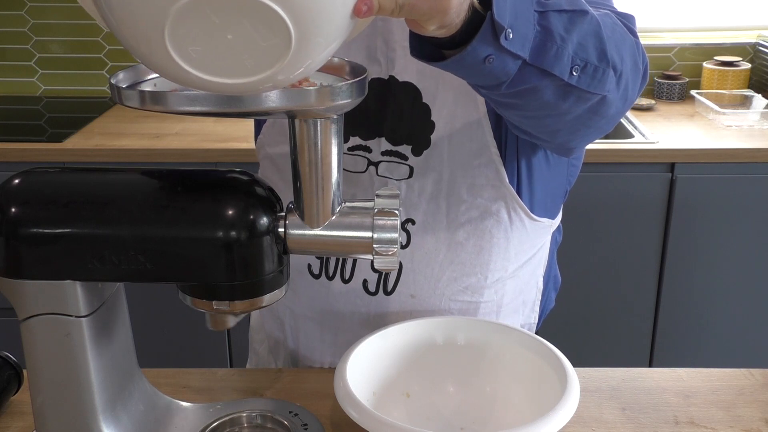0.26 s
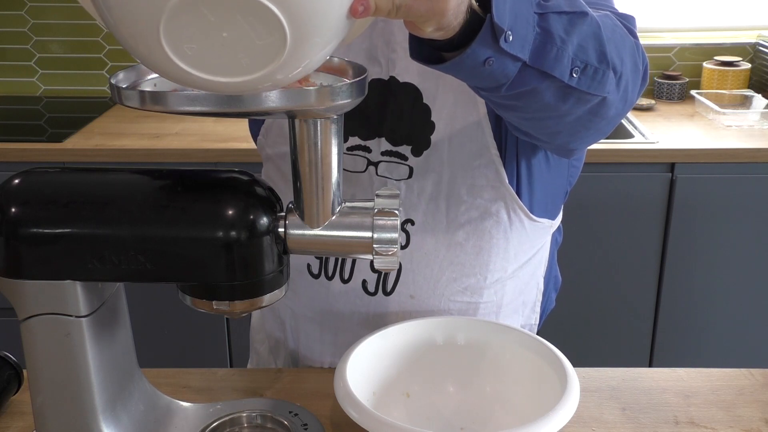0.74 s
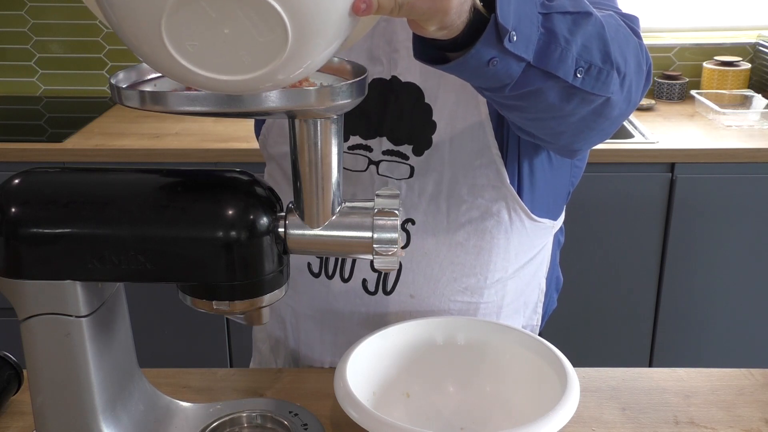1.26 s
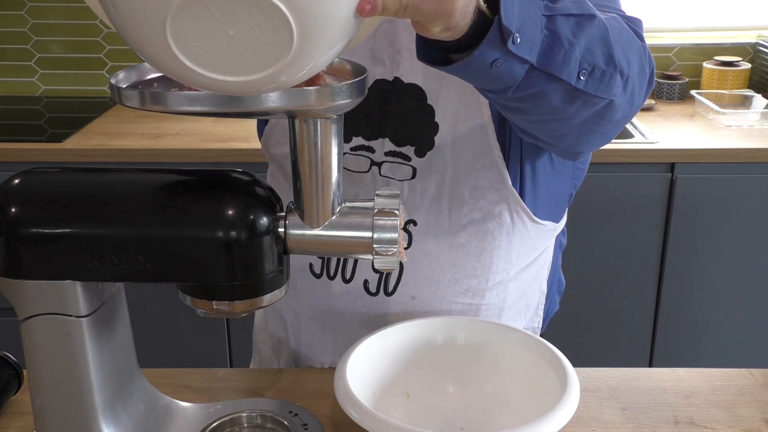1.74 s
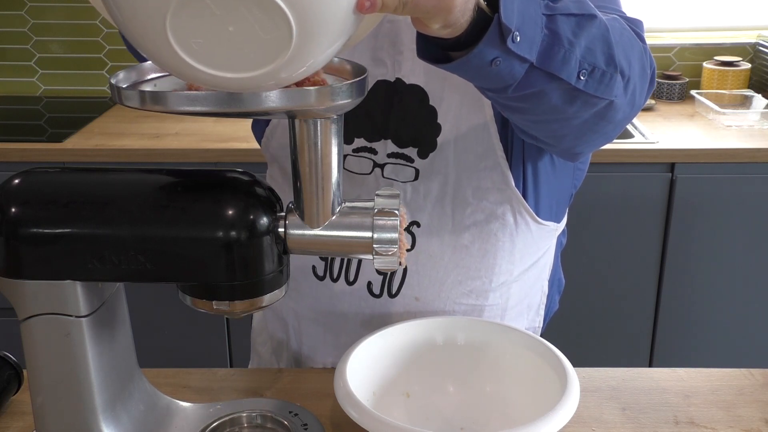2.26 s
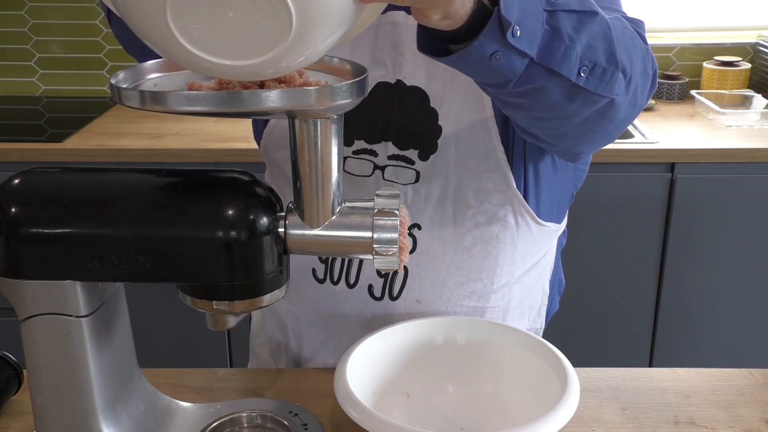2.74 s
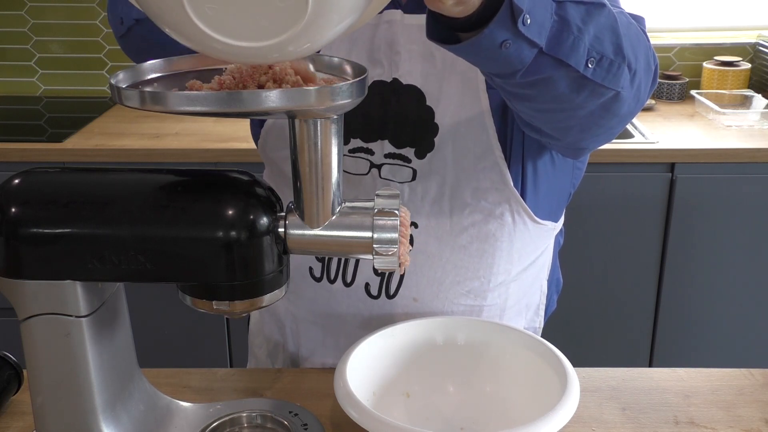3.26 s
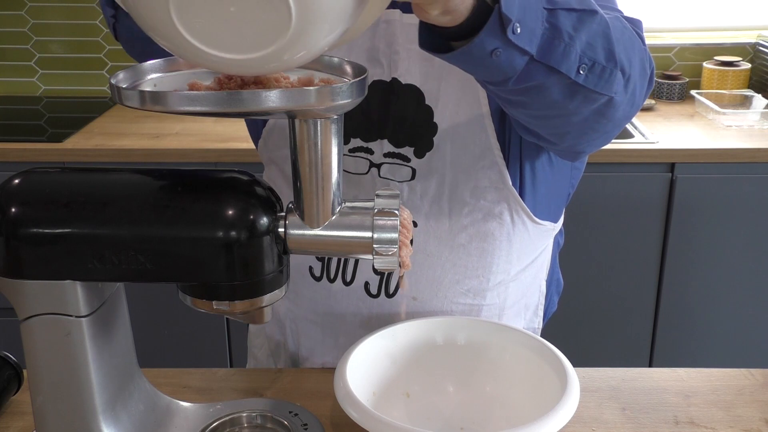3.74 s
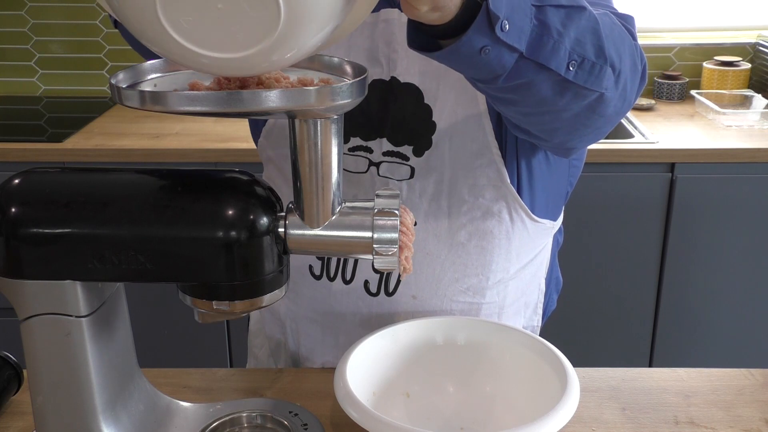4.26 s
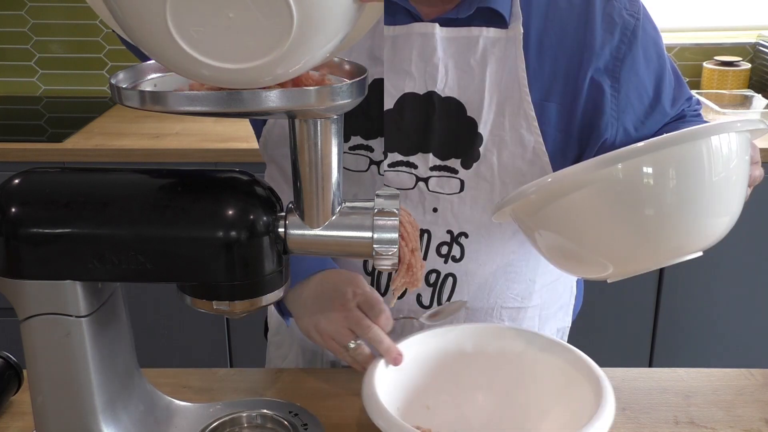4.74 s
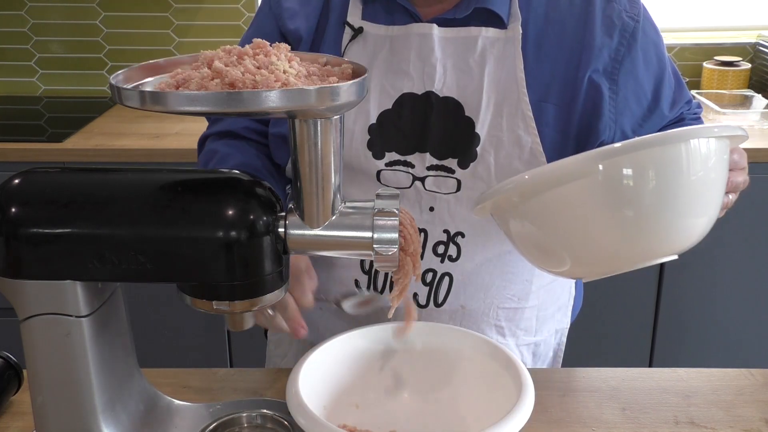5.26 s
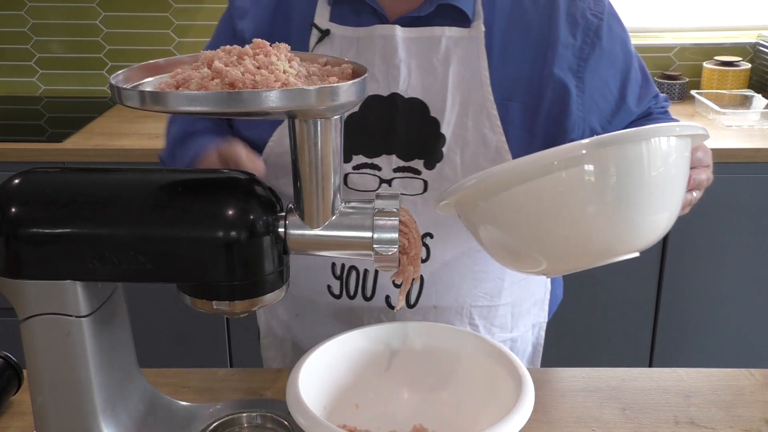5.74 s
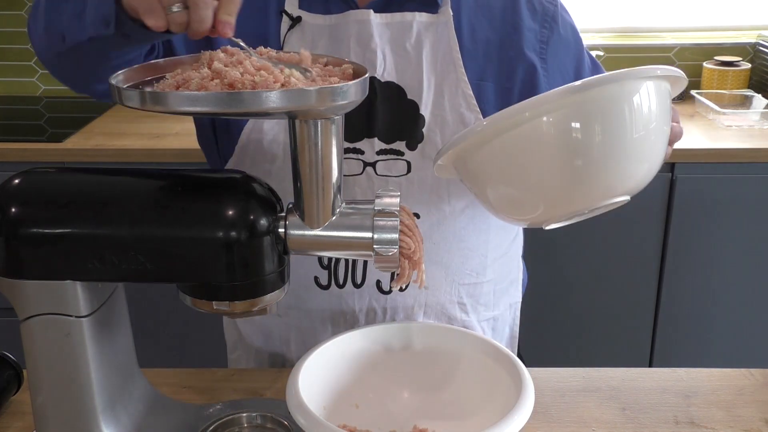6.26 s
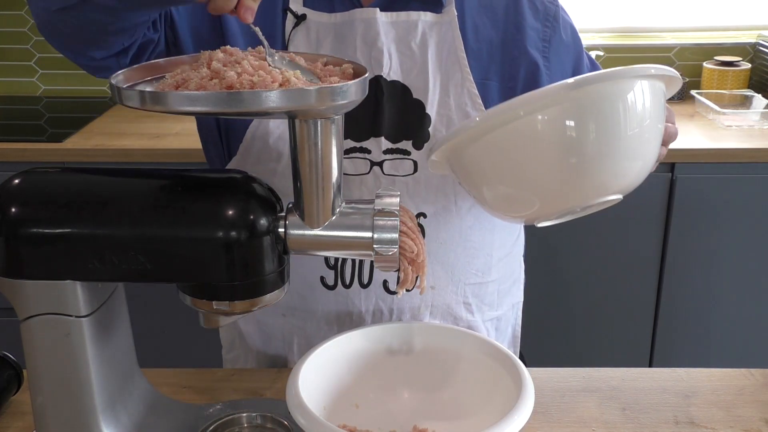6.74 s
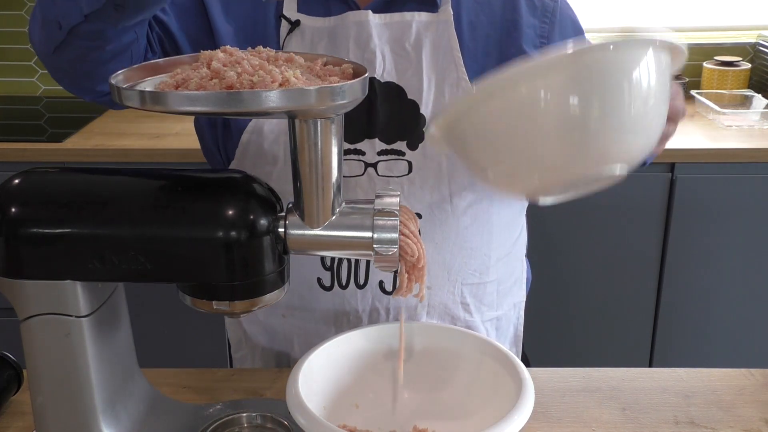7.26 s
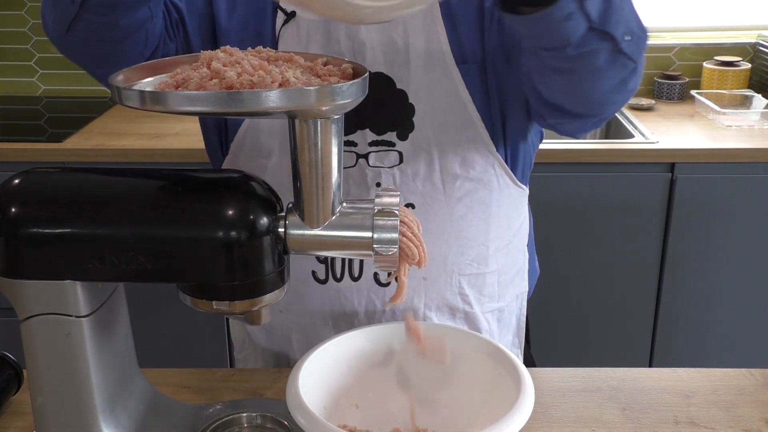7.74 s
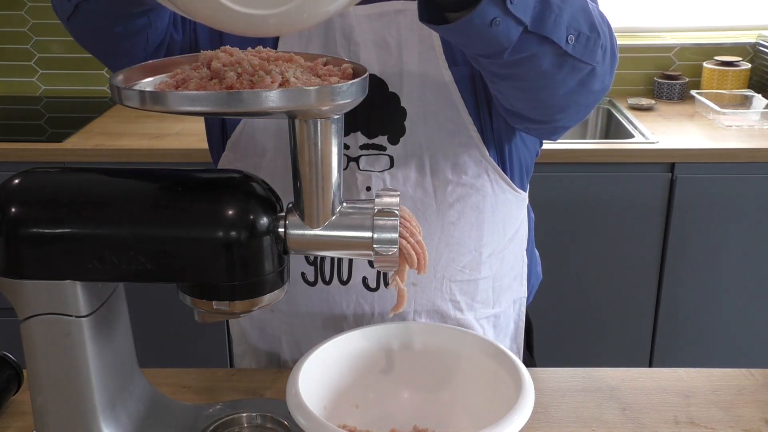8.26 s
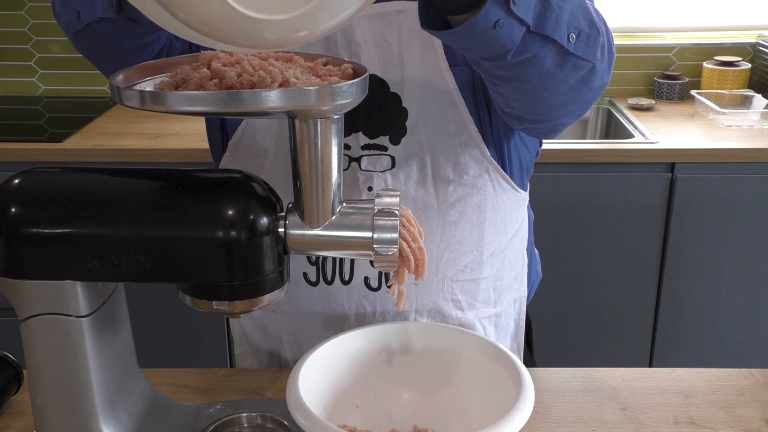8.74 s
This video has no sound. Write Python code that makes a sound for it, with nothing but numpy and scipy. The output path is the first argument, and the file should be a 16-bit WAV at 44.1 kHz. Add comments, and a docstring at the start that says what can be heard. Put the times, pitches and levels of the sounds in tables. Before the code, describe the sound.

A mixer motor hums and whines steadily while driving a meat mincer, with metallic gear ticking, wet gritty crunches, utensil clinks and bowl knocks.

```python
"""Mixer-driven meat mincer

A stand mixer drives a meat mincer on a kitchen counter. The motor hums at multiples of twice the mains,
whines at a pitch that sags as the screw bites, and roars as shaped noise through its housing.
Gear teeth tick as grazed ringing modes, meat crunches in grainy noise bursts, a spoon clinks on the tray,
bowls knock. Midway the sound crossfades into a brighter one and the hum dips."""
import sys
import numpy as np
from scipy import signal
from scipy.io import wavfile
from scipy.ndimage import uniform_filter1d

SR = 44100
rng = np.random.default_rng(int(sys.argv[2]) if len(sys.argv) > 2 else 0)


def master(y):
    """Save y as 16-bit WAV."""
    cut = np.clip(np.atleast_2d(y).T, -1, 1)
    pcm = np.round(cut * 32767)  # scale
    wavfile.write(sys.argv[1], SR, pcm.astype(np.int16))


N = 396900
T = np.arange(N) / SR

# Whine pitch at the turning points of each bite of the screw: time_s, pitch_hz
WHINE_PITCH = [(-.2, 1847), (.08, 1781), (.47, 1891), (.97, 1761), (1.27, 1885), (1.751, 1752),
               (2.04, 1866), (2.3, 1905), (2.57, 1790), (3.08, 1910), (3.35, 1801), (3.6, 1850),
               (3.86, 1915), (4.211, 1805), (4.62, 1921), (4.97, 1810), (5.5, 1945), (5.87, 1847),
               (6.12, 1927), (6.36, 1948), (6.599, 1834), (7.17, 1957), (7.46, 1877), (7.829, 1988),
               (8.221, 1810), (8.62, 1967), (9.05, 1835)]
# Hum partials: multiple_of_hum, dull_relative_db, bright_relative_db, waver_db
HUM_PARTIALS = [(1, 0.5, 1, 0.56), (2, -23.5, -22, 1.5), (3, -19, -16, 1.5), (3.5, -30, -34, 10),
                (4, -7.5, -8, 1.5), (5, -7, -10.5, 2.5), (6, -23, -20, 1), (8, -24, -23, 1.5),
                (10, -25.5, -24, 4.5), (12, -35.5, -38, 7), (15, -28, -24, -1)]
# Counter buzz: time_s, level_db
COUNTER_BUZZ = [(0.0, -22), (0.12, -32), (4.21, -27), (4.81, -34), (8.72, -26), (9.0, -36)]
# Whine partials: multiple_of_whine, offset_in_multiples_of_hum, dull_base_db, bright_base_db
WHINE_PARTIALS = [(1, 0, -43.5, -41.5), (1, 1, -54, -54), (2, -0.15, -55, -50.5), (2.5, -0.5, -58, -60),
                  (3, 0, -58, -50.5), (4, -0.5, -46, -48), (5, 0, -47, -48.5), (4, 6, -61, -57)]
# Housing resonances: centre_hz, width_hz, dull_lift_db, bright_lift_db
HOUSING_MODES = [(374, 48, 2, 11), (874, 98, 5, -2), (1178, 50, 4.5, 9), (1497, 62, 4.5, 13.5),
                 (1914, 70, 4.5, 5.5), (2076, 87, 10.5, 8.5), (2890, 230, 3.5, 16.5), (3230, 74, 8.5, 7),
                 (3430, 83, -2.5, 11.5), (3900, 240, 2.5, 10.5), (4420, 230, 4, 1), (5630, 230, 5.5, 2),
                 (6100, 520, 7.5, 9), (7700, 190, 5.5, 5.5), (8370, 190, 2.5, 6), (8900, 95, 6.5, 13),
                 (10540, 170, 5, 4), (12300, 300, 7, -1), (14700, 600, 13, -2)]
# Roar spectrum, dull: frequency_hz, relative_density_db
DULL_ROAR = [(12, -66), (20, -32), (42, -23), (66, -20.5), (101, -10), (129, -24), (153, -17.5), (343, -15),
             (492, -8), (566, -12.5), (2040, -24.5), (2340, -32.5), (5110, -37.5), (8910, -29.5),
             (15600, -43.5)]
# Roar spectrum, bright: frequency_hz, relative_density_db
BRIGHT_ROAR = [(12, -65), (20, -31), (42, -25), (66, -17), (101, -13.5), (129, -24), (153, -20.5),
               (245, -24.5), (479, -15), (669, -12), (1340, -21), (2040, -17), (2410, -28), (6210, -30),
               (15600, -33.5)]
# Gear pace: time_s, turns_made
GEAR_TURNS = [(.071, 0), (4.227, 24), (4.770, 27), (8.982, 52)]
# Tick of each gear tooth: dull_base_db, bright_base_db
TOOTH_LEVELS = [(-20.5, -17.5), (-37, -16.5), (-27, -21), (-32, -21)]
# Loudest gear ticks: start_s, peak_db
LOUD_TICKS = [(0.0686, -15.5), (.4189, -22), (0.758, -18), (1.2885, -21), (1.459, -16.5), (0.9388, -15),
              (1.117, -16), (1.6367, -18), (1.8188, -17), (2.156, -19), (3.1413, -19.5), (3.3662, -17),
              (4.7693, -13.5), (4.9412, -12), (5.1636, -16), (5.5, -14.5), (5.6221, -10.5), (5.7068, -14),
              (5.7927, -13), (6.0096, -16), (5.836, -12.5), (6.2987, -14), (6.341, -10.5), (6.4067, -13),
              (6.548, -12), (6.681, -12.5), (7.3035, -12), (7.349, -12.5), (7.3886, -10), (7.806, -17),
              (8.1364, -16), (8.3589, -13), (8.6894, -14.5), (8.766, -10.5), (8.8104, -14)]
# Ringing modes of the mincer head: nominal_hz, relative_db, t60_s
HEAD_MODES = [(1470, -0.5, 0.019), (1943, 2, 0.016), (2057, 3, 0.028), (2440, -12, 0.012),
              (2754, -4, 0.023), (3170, -7, 0.016), (4020, -8, 0.0066), (4770, -12, 0.0055),
              (5630, -15, 0.0064)]
# Loudest meat crunches: start_s, peak_db
LOUD_CRUNCHES = [(1.8856, -21), (3.484, -18), (5.731, -14.5), (5.7642, -15), (6.452, -16), (6.502, -20),
                 (7.309, -9), (8.072, -15), (8.118, -18), (8.2181, -17), (8.8325, -13)]
# Spoon and tray clinks: start_s, ring_peak_db, strongest_ring_hz
SPOON_CLINKS = [(1.022, -25, 6500), (1.448, -22, 8020), (1.499, -26, 8100), (2.567, -18.5, 6830),
                (2.859, -4, 5630), (3.008, -20.5, 8370), (3.413, -22, 6550), (4.082, -21.5, 6260),
                (4.297, -17.5, 6800), (4.687, -19, 2900), (5.973, -20, 6370), (6.676, -18.5, 6100),
                (7.548, -23, 6750), (7.611, -19, 6800), (7.991, -23, 4670), (8.222, -22, 6570)]
# Ringing modes of the tray: pitch_hz, relative_db, t60_s
TRAY_MODES = [(2110, -2, 0.025), (3620, -14, 0.044), (4930, -11, 0.071), (5630, -9.5, 0.025),
              (6500, -27, 0.04), (7280, -4, 0.021), (7970, -23, 0.025), (8800, -14.5, 0.029),
              (11100, -11, 0.014), (13500, -31, 0.01)]
# Bowl knocks: start_s, peak_db, pitch_hz, t60_s
BOWL_KNOCKS = [(.588, -15, 1006, 0.053), (2.853, -20, 110, 0.037), (4.688, -16.5, 224, 0.043),
               (4.738, -18, 203, 0.034), (5.768, -13.5, 702, 0.079), (7.992, -3, 570, 0.048),
               (8.232, -10.5, 686, 0.032)]

BLEND_FROM_S, BLEND_TO_S = 4.42, 4.885
BRIGHT_SHARE, BRIGHT_BEND = 0.47, 1.5
HUM_HZ, HUM_DB = 100.04, -19.5
OUT_OF_STEP_PERIODS = 0.4753  # between dull and bright hum: the fundamental nearly cancels midway
DRONE_HZ, DRONE_DULL_DB, DRONE_BRIGHT_DB = 870, -52, -38
REFERENCE_HZ, REFERENCE_CREEP_HZ_PER_S = 1830, 16  # whine pitch from which sag is counted
STRAIN_DB_PER_100_HZ = 3
ROAR_DULL_DB, ROAR_BRIGHT_DB = -26, -25
TREBLE_HZ, TREBLE_OPEN_S, TREBLE_DIP_DB = 9100, 5.5, -2
BITE_DB, SCRAPE_S = 2.5, 0.0025
CRUNCH_BASE_HZ, CRUNCH_TOP_HZ, CRUNCH_S = 1490, 4320, 0.0065  # top and length vary per crunch
TICK_CRUNCH_DB, POP_DB = -11, -4.5  # relative to the tick, to the crunch
CRACKLES, CRACKLE_BASE_DB = 460, -33
SNAP_DB, SNAP_T60_S = -2.5, 0.025
EDGE_HZ = 15720


def amp(db):
    """Gain of a dB value."""
    return 10 ** (np.asarray(db) / 20)


def evened(x):
    """Scales to rms 1."""
    return x / np.sqrt(np.mean(x ** 2) + 1e-20)


def curve(rows, t):
    """A (time, value) table at times t."""
    at, value = np.array(rows).T
    return np.interp(t, at, value)


def wander(hz):
    """Smoothed random drift of rms 1, varying at up to about hz."""
    knots = np.arange(0, N / SR + 2 / hz, .5 / hz)
    drift = np.interp(T, knots, rng.standard_normal(len(knots)))
    return evened(uniform_filter1d(drift, int(SR / hz / 4)))


def blend(t):
    """Share of the brighter sound, 0 to 1."""
    return np.clip((t - BLEND_FROM_S) / (BLEND_TO_S - BLEND_FROM_S), 0, 1)


def brightness(t):
    """Share of the bright roar and housing colour, 0 to BRIGHT_SHARE."""
    return np.clip(BRIGHT_SHARE * blend(t) ** BRIGHT_BEND, 0, 1)


def housing_db(hz, bright):
    """Lift from the housing at hz: a sum of resonance peaks."""
    lift_db = 0
    for centre_hz, width_hz, dull_db, bright_db in HOUSING_MODES:
        peak_db = dull_db + bright * (bright_db - dull_db)
        lift_db = lift_db + peak_db / (1 + ((hz - centre_hz) / (width_hz / 2)) ** 2)
    return lift_db


def motor():
    """Whine pitch in Hz, easing between the listed points as the screw loads and frees the motor."""
    at, hz = np.transpose(WHINE_PITCH)
    index = np.arange(len(at))
    place = np.interp(T, at, index)
    eased = np.floor(place) + np.sin(np.pi / 2 * (place % 1)) ** 2
    return uniform_filter1d(np.interp(eased, index, hz), int(.08 * SR))


def hum(speed):
    """Magnetic pull at twice the mains; load weakens the fourth multiple, which surges on recovery."""
    sag_percent = 100 * (1 - speed / uniform_filter1d(speed, int(.8 * SR)))
    gaining_percent_per_s = uniform_filter1d(-np.gradient(sag_percent) * SR, 4000)
    load_db = np.minimum(-2.4 * sag_percent + 0.06 * gaining_percent_per_s, 1.5)
    out, over = np.zeros(N), blend(T)
    for order, dull_db, bright_db, waver_db in HUM_PARTIALS:
        level_db = dull_db + over * (bright_db - dull_db) + waver_db * wander(7)
        if order == 4:
            level_db = level_db + load_db
        turns = order * HUM_HZ * T + rng.random() + 0.0063 * waver_db * wander(9)
        dull = np.sin(2 * np.pi * turns)
        bright = np.sin(2 * np.pi * (turns - order * OUT_OF_STEP_PERIODS))
        out += amp(level_db) * ((1 - over) * dull + over * bright)
    return np.sqrt(2) * amp(HUM_DB) * out


def buzz():
    """Counter resonance: noise between the fourth and fifth hum multiples, plus a thin wavering drone."""
    drone_db = DRONE_DULL_DB + blend(T) * (DRONE_BRIGHT_DB - DRONE_DULL_DB) + 3.2 * wander(2.5)
    drone_turns = np.cumsum(DRONE_HZ + 5.8 * wander(5)) / SR
    drone = amp(drone_db) * np.sin(2 * np.pi * drone_turns)
    b, a = signal.butter(2, [436, 486], "bandpass", fs=SR)
    rattle = evened(signal.lfilter(b, a, rng.standard_normal(N)))
    return drone + amp(curve(COUNTER_BUZZ, T)) * rattle


def whine(speed):
    """Commutator tone and blurred partials, lifted by housing resonances; sag lifts the dull whine."""
    turns = np.cumsum(speed * (1 + 0.00149 * wander(40))) / SR
    over = blend(T)
    sag_hz = REFERENCE_HZ + REFERENCE_CREEP_HZ_PER_S * T - speed
    strain_db = STRAIN_DB_PER_100_HZ * (1 - over) * sag_hz / 100
    bright, out = brightness(T[::64]), np.zeros(N)
    for order, side, dull_db, bright_db in WHINE_PARTIALS:
        coarse_db = 1.42 * housing_db(order * speed[::64] + side * HUM_HZ, bright)
        lift_db = np.repeat(coarse_db, 64)[:N]
        blur_turns = 0.02 * order * wander(120)
        level_db = dull_db + over * (bright_db - dull_db) + lift_db + strain_db + 2.9 * wander(9)
        phase = order * turns + side * HUM_HZ * T + blur_turns
        out += amp(level_db) * np.sin(2 * np.pi * phase)
    return out


def roar():
    """Brush, fan and gear noise: patchy random spectra; the treble throbs at the hum rate and flutters."""
    frames, hz = N // 512 + 5, np.fft.rfftfreq(2048, 1 / SR)[:, None]
    t = np.arange(frames) * 512 / SR
    real, imaginary, patches = rng.standard_normal((frames, 1025, 3)).T
    patches = evened(uniform_filter1d(uniform_filter1d(patches, 20, 0), 10, 1))

    def spectrum_db(rows):
        at_hz, db = np.array(rows).T
        return np.interp(np.log(hz + 1), np.log(at_hz), db)

    dull_db, bright_db = spectrum_db(DULL_ROAR), spectrum_db(BRIGHT_ROAR)
    bright = brightness(t)
    shape_db = dull_db + bright * (bright_db - dull_db) + housing_db(hz, bright) + 1.3 * patches
    # top treble sinks in the blend and returns slowly
    dip_db = np.interp(t, [BLEND_FROM_S, BLEND_TO_S, TREBLE_OPEN_S], [0, TREBLE_DIP_DB, 0])
    shape_db += (hz > TREBLE_HZ) * dip_db
    spectra = (real + 1j * imaginary) * amp(shape_db)
    noise = evened(signal.istft(spectra, nperseg=2048, noverlap=1536)[1][:N])
    highpass = signal.butter(2, 2500, "highpass", fs=SR, output="sos")
    treble = signal.sosfiltfilt(highpass, noise)
    throb = 0.077 * np.sin(2 * np.pi * HUM_HZ * T) + 0.072 * wander(60)
    over = blend(T)
    level = np.hypot((1 - over) * amp(ROAR_DULL_DB), over * amp(ROAR_BRIGHT_DB))
    return level * (noise + throb * treble)


def add(mix, s, sound):
    """Adds a sound at second s."""
    part = mix[round(s * SR):][:len(sound)]
    part += sound[:len(part)]


def ring(modes, size=4000):
    """Sum of (hz, db, t60_s) dying modes with random phases and a soft 1 ms start, peak 1."""
    t = T[:size]
    out = np.zeros(size)
    for hz, db, t60_s in modes:
        out += amp(db - 60 * t / t60_s) * np.sin(2 * np.pi * (hz * t + rng.random()))
    out = out * (1 - np.exp(-t / 0.00026))
    return out / abs(out).max()


def graze(sound):
    """Smears a hit over a short rough contact of sparse random impulses, peak 1."""
    t = T[:700]
    sparse = rng.random(700) < .15
    contact = rng.standard_normal(700) * np.exp(-t / SCRAPE_S) * sparse
    out = np.convolve(sound, contact + (t == 0))
    return out / abs(out).max()


def crunch():
    """Grainy burst of wide noise, peak 1; each has its own length and brightness."""
    t = T[:2000] / (CRUNCH_S * rng.uniform(0.54, 1.15))
    band_hz = [CRUNCH_BASE_HZ, CRUNCH_TOP_HZ * rng.uniform(0.51, 1.36)]
    b, a = signal.butter(2, band_hz, "bandpass", fs=SR)
    grain_db = 5.2 * np.repeat(rng.standard_normal(50), 40)
    grains = rng.standard_normal(2000) * amp(grain_db)
    out = signal.lfilter(b, a, grains) * np.sqrt(t) * np.exp(-t)
    return out / abs(out).max()


def gears(speed):
    """Teeth tick unevenly in step with the motor, each ringing the head a little differently."""
    spun = np.cumsum(speed) / SR
    at, turns = np.transpose(GEAR_TURNS)
    teeth = len(TOOTH_LEVELS)
    tooth = np.arange(4 * turns[-1] + 1).astype(int)
    spun_at_tooth = np.interp(tooth / teeth, turns, np.interp(at, T, spun))
    when = np.interp(spun_at_tooth, spun, T)
    slowing = np.interp(when, T, evened(-np.gradient(speed)))
    dull_db, bright_db = np.array(TOOTH_LEVELS)[tooth % teeth].T
    chance = rng.standard_normal((len(when), 2))
    # in the bright sound ticks swell as the motor slows
    level_db = dull_db + blend(when) * (bright_db - dull_db + BITE_DB * slowing)
    level_db += 0.53 * np.clip(chance[:, 0], -3, 1.5)
    # a listed loud tick replaces any regular one within 15 ms
    free = abs(when[:, None] - np.array(LOUD_TICKS)[:, 0]).min(axis=1) > .015
    regular = list(zip(abs(when + .0025 * chance[:, 1])[free], level_db[free]))
    out = np.zeros(N)
    for s, db in LOUD_TICKS + regular:
        add(out, s, amp(db + TICK_CRUNCH_DB) * crunch())
        modes = [(hz * rng.uniform(0.944, 1.05), mode_db + 0.54 * rng.standard_normal(), t60_s)
                 for hz, mode_db, t60_s in HEAD_MODES]
        add(out, s, amp(db) * graze(ring(modes, size=2000)))
    return out


def meat():
    """Meat crunches and crackles, each popping the head's modes; crackles are louder in the bright sound."""
    out = np.zeros(N)
    stray = rng.random((CRACKLES, 2)) * [N / SR, 1]
    crackles = [(s, CRACKLE_BASE_DB + 8.3 * blend(s) - 2.0 * np.log(u + 0.024)) for s, u in stray]
    for s, db in LOUD_CRUNCHES + crackles:
        add(out, s, amp(db) * crunch())
        modes = [(hz * rng.uniform(0.92, 1.09), .5 * mode_db, t60_s) for hz, mode_db, t60_s in HEAD_MODES]
        add(out, s, amp(db + POP_DB) * ring(modes, size=1000))
    return out


def handling():
    """A clink rings its own spot and the whole tray under a dry snap; a bowl knock is a short dull push."""
    out = np.zeros(N)
    for s, db, hz in SPOON_CLINKS:
        spot = [(hz, 3.5, .022), (0.97 * hz, -4, .015)]
        add(out, s, amp(db) * graze(ring(TRAY_MODES + spot)))
        snap = signal.lfilter([1, 0, -1], [1, -.9, .45], rng.standard_normal(2000)) / 4
        add(out, s, amp(db + SNAP_DB - 60 * T[:2000] / SNAP_T60_S) * snap)
    for s, db, hz, t60_s in BOWL_KNOCKS:
        modes = [(hz, 0, t60_s), (0.47 * hz, -3, t60_s), (0.79 * hz, -4, t60_s),
                 (1.55 * hz, -5, 0.81 * t60_s), (2.1 * hz, -12, .5 * t60_s)]
        add(out, s, amp(db) * ring(modes))
    return out


def kitchen(x):
    """Room tail: sparse reflections of random sign, dying with a 0.41 s t60."""
    taps = np.zeros(SR // 3)
    at = np.arange(200, len(taps) - 20, 20)
    taps[at + rng.integers(0, 20, len(at))] = rng.choice([-1., 1.], len(at))
    taps *= amp(-60 * T[:len(taps)] / 0.41)
    return signal.fftconvolve(x, taps / np.linalg.norm(taps))[:N]


def scene():
    """Motor, gears, meat and handling, heard close; only the hits feed the room."""
    speed = motor()
    hits = gears(speed) + meat() + handling()
    machine = hum(speed) + buzz() + whine(speed) + roar()
    return (machine + hits + amp(-12) * kitchen(hits))[None]


def record(dry):
    """A limiter ducks just after sharp peaks, then a clip and a low-pass bound the sound."""
    peak_db = 20 * np.log10(abs(dry[0]) + 1e-9)
    fall_db = np.arange(N) * 130.0 / SR  # held peak falls 130 dB/s
    held_db = np.maximum.accumulate(peak_db + fall_db) - fall_db
    over_db = np.maximum(held_db + 6.5, 0)
    late_db = np.concatenate([np.zeros(250), uniform_filter1d(over_db, 450)])[:N]  # a few ms late
    ducked = np.clip(dry / amp(0.8 * late_db), -.97, .97)
    lowpass = signal.firwin(1023, EDGE_HZ, window=("kaiser", 9), fs=SR)
    return signal.oaconvolve(ducked, lowpass[None], "same")


dry = scene()
out = record(dry)
master(out)
```